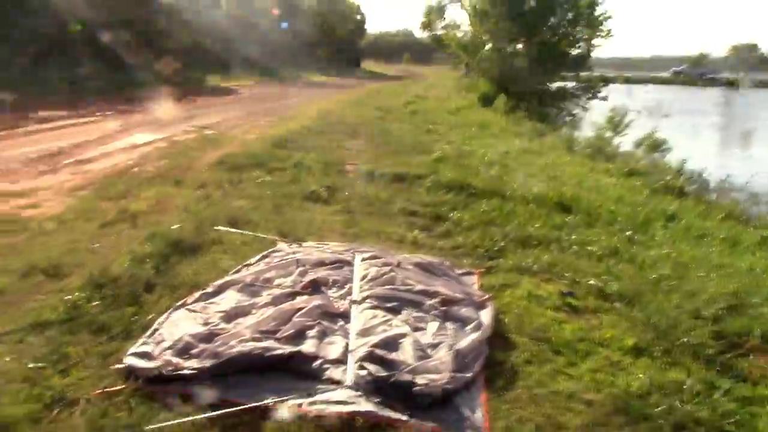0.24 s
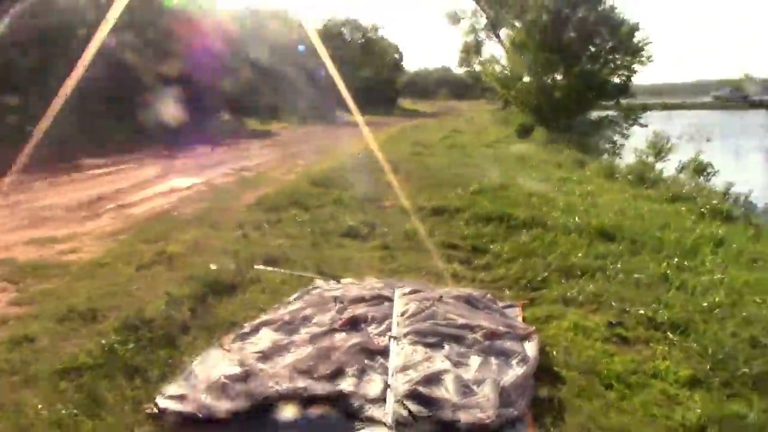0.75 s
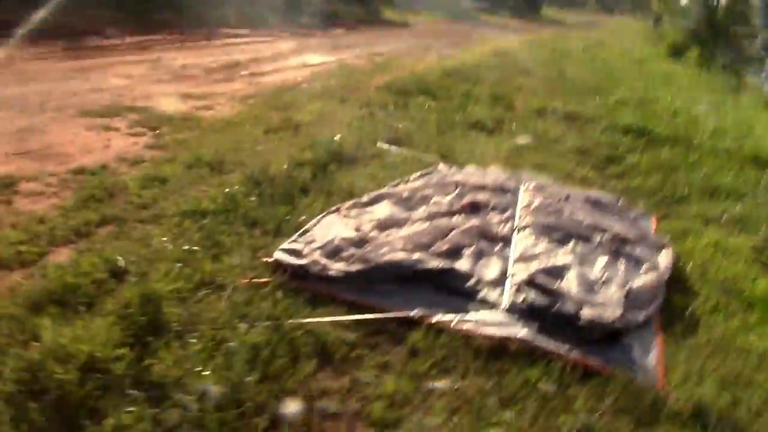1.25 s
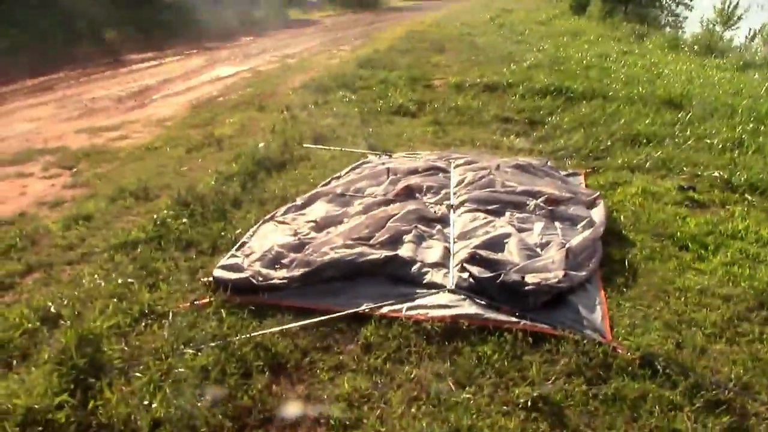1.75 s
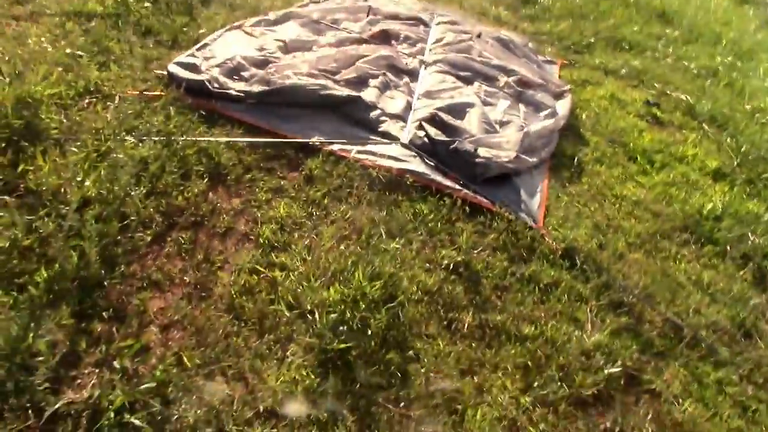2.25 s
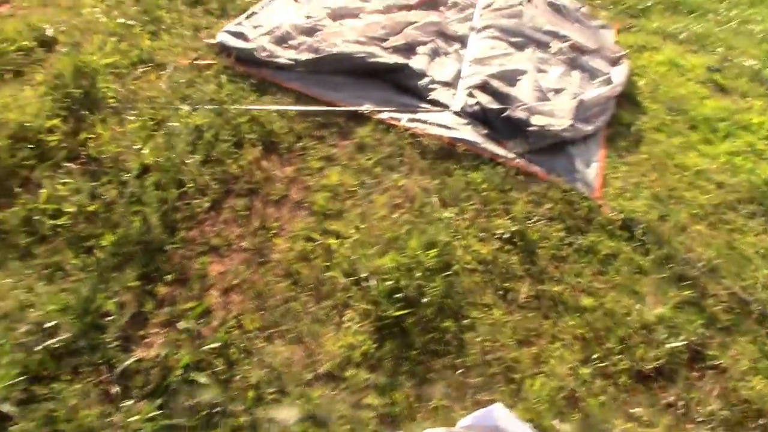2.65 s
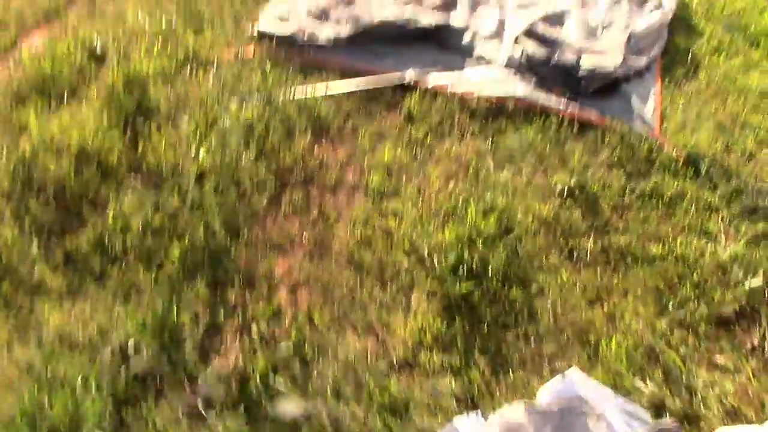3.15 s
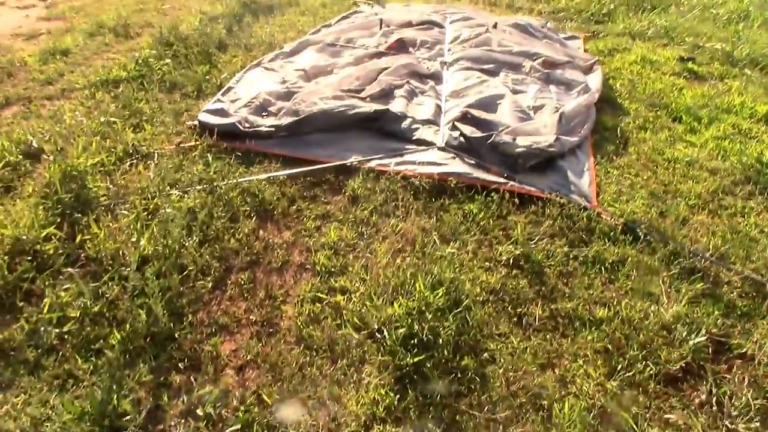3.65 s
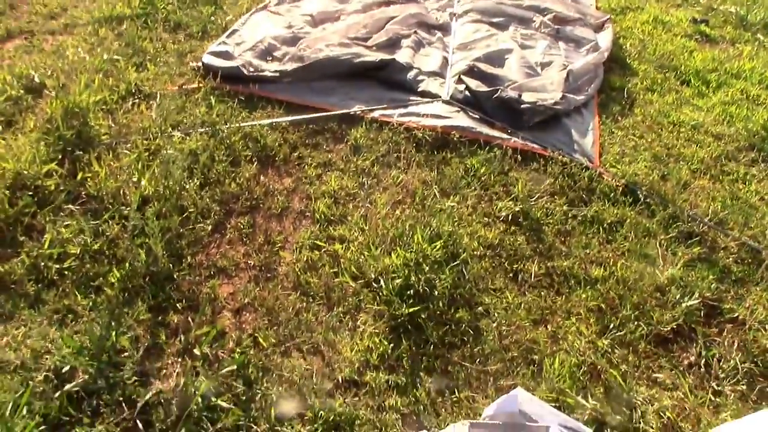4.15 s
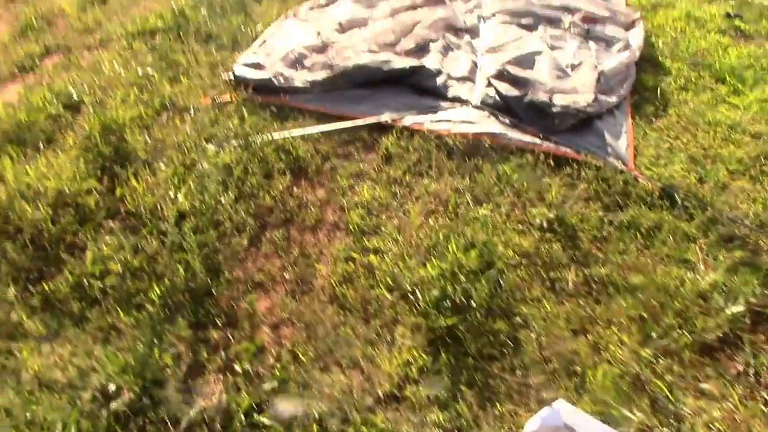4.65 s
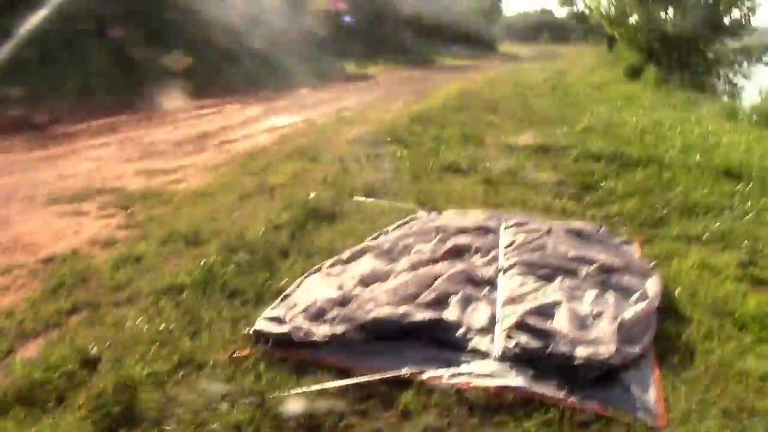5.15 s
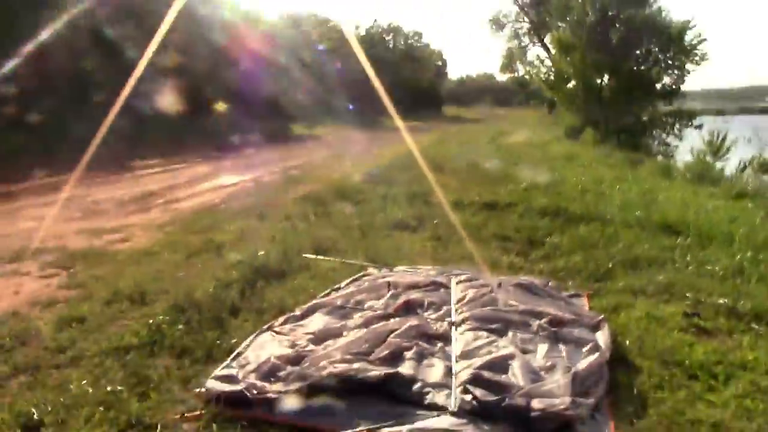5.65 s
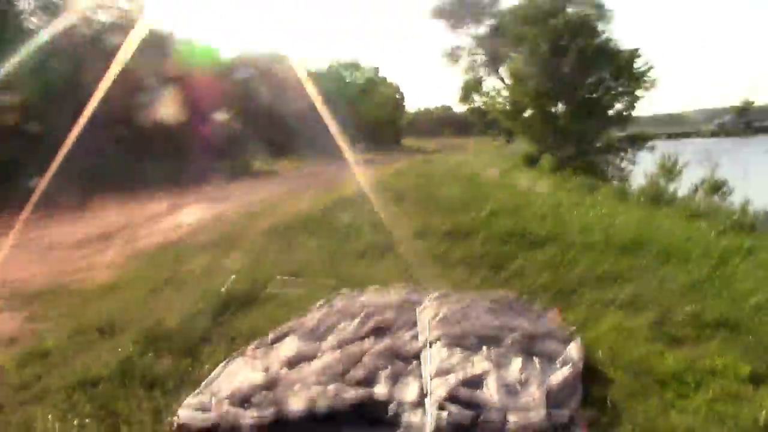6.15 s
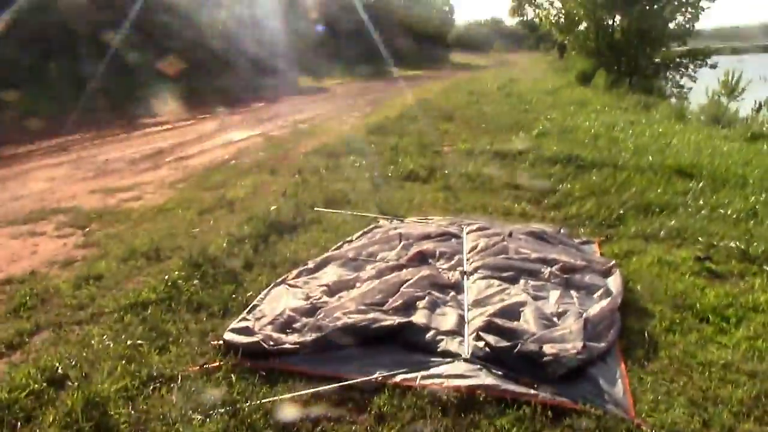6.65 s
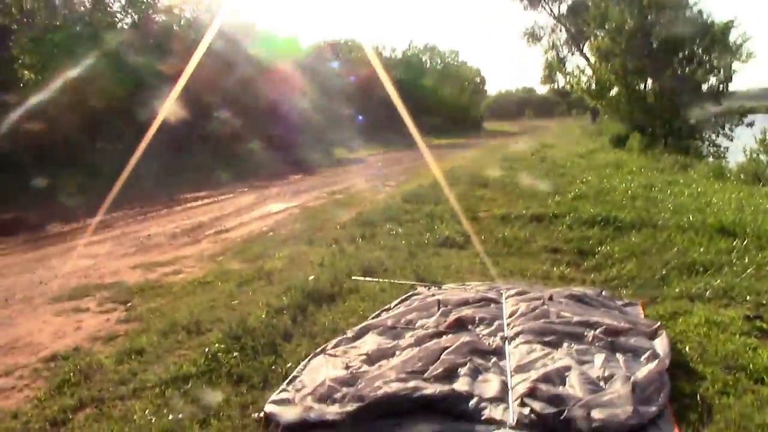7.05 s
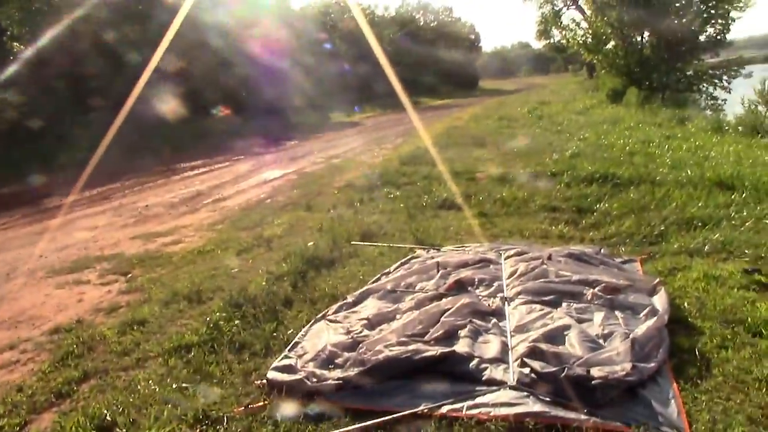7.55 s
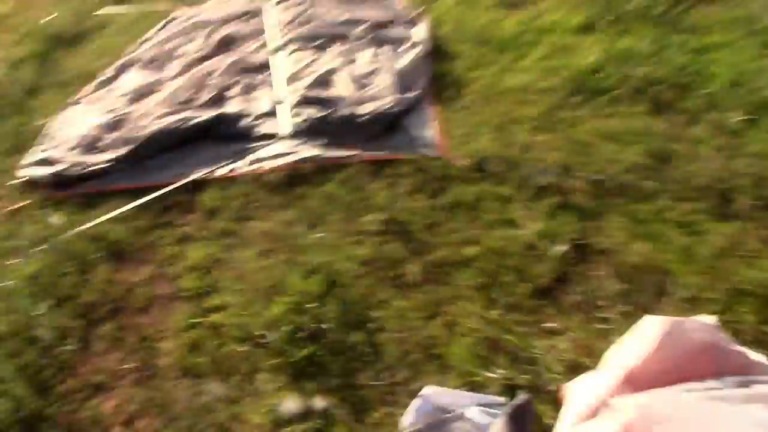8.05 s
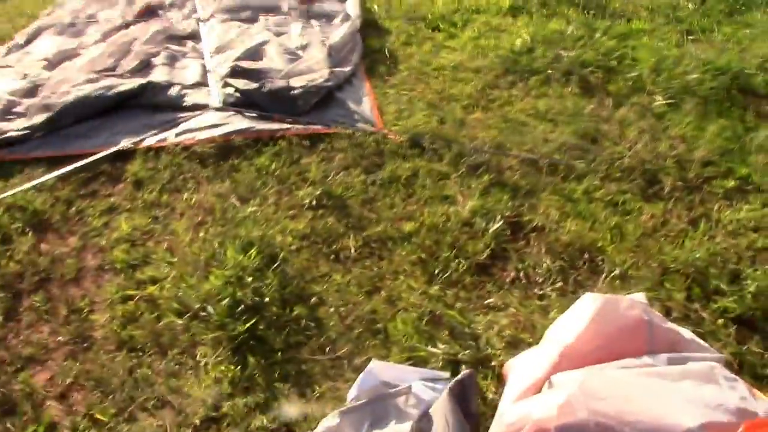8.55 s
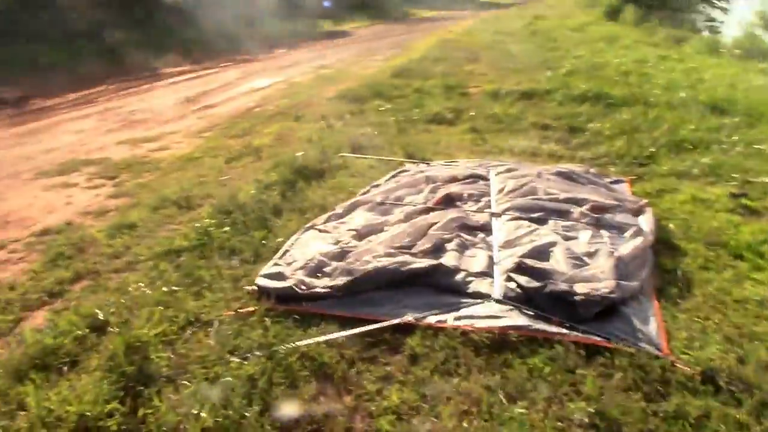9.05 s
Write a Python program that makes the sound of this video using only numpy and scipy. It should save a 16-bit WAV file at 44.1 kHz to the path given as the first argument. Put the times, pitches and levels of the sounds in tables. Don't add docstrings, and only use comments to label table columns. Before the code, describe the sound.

Thin tent poles clack, knock and tick close up as nylon rustles, with faint insects whining over a quiet outdoor hush.

```python
import sys
import numpy as np
from scipy import signal
from scipy.fft import rfft, irfft, next_fast_len
from scipy.io import wavfile
from scipy.ndimage import uniform_filter1d

SR = 44100
rng = np.random.default_rng(int(sys.argv[2]) if len(sys.argv) > 2 else 0)


def volts_from_decibels(level):
    exponent = np.asarray(level, float) / 20
    return 10 ** exponent


def master(y):
    cut = np.clip(np.atleast_2d(y).T, -1, 1)
    pcm = np.round(cut * 32767)
    wavfile.write(sys.argv[1], SR, pcm.astype(np.int16))


N = 410571


def rms_one(x):
    return x / np.sqrt(np.mean(x ** 2) + 1e-20)


def filtered(x, order, hz, kind):
    return signal.sosfilt(signal.butter(order, hz, kind, fs=SR, output="sos"), x)


def in_time(rows):
    s, *columns = np.transpose(rows)
    return [np.interp(np.arange(N) / SR, s, c) for c in columns]


def drift(rate_hz):
    r = np.exp(-80 * np.pi * rate_hz / SR)
    slow = signal.lfilter([1], [1, -2 * r, r * r], rng.standard_normal(N // 40 + 2002))[2000:]
    return np.interp(np.arange(N) / 40, np.arange(len(slow)), rms_one(slow))


def resonate(x, hz, width_hz):
    r = np.exp(-np.pi * width_hz / SR)
    denominator = [1, -2 * r * np.cos(2 * np.pi * hz / SR), r * r]
    return signal.lfilter([(1 - r * r) / 2, 0, (r * r - 1) / 2], denominator, x)


def coloured(x, spectrum):
    hz, db = np.transpose(spectrum)
    size = next_fast_len(N)
    log_hz = np.log(np.arange(size // 2 + 1) * SR / size + 1)
    gain = volts_from_decibels(np.interp(log_hz, np.log(hz), db))
    return rms_one(irfft(rfft(x, size) * gain, size)[:N])


def whine(hz, width_hz, size=N):
    once = resonate(rng.standard_normal(size), hz, width_hz)
    return rms_one(resonate(once, hz, 2 * width_hz))


def brief_whines(rows):
    out = np.zeros(N)
    for s, half_s, hz, width_hz, db in rows:
        at = max(round(s * SR) - SR, 0)
        t = np.arange(at, at + 2 * SR) / SR
        add = volts_from_decibels(db) * np.exp(-((t - s) / half_s) ** 4) * whine(hz, width_hz, size=2 * SR)
        out[at:at + 2 * SR] += add[:N - at]
    return out


def grit(per_s, spread_db):
    sizes = volts_from_decibels(spread_db * np.minimum(rng.exponential(1, N), 3.5)) * rng.choice([-1, 1], N)
    return rms_one(sizes * (rng.random(N) < per_s / SR) + 1e-9)


def rubbed(body, per_s, spread_db, patchy_db):
    out = 0
    for hz, width_hz, db in body:
        once = resonate(grit(per_s, spread_db), hz, width_hz)
        ring = rms_one(resonate(once, hz, 5.45 * width_hz))
        out = out + volts_from_decibels(db + patchy_db * drift(46.0)) * ring
    return rms_one(out)


def blows(rows, t60_s, width_share, contact_s, spill_db, spill_hz):
    out, t = np.zeros(N + 2048), np.arange(2048) / SR
    chatter, chance = rng.standard_normal((len(rows), 2048)), rng.uniform(-1, 1, (len(rows), 2))
    for (s, db, hz), noise, (off, grip) in zip(rows, chatter, chance):
        t60 = t60_s * volts_from_decibels(0.58 * grip)
        noise[4] = 2.9
        decay = np.exp(-t / contact_s) + 0.77 * volts_from_decibels(-45 * t / t60)
        force = noise * (1 - np.exp(-t / 0.0001)) * decay
        ring = resonate(force, hz, 2.94 / t60)
        ring = ring + 0.61 * resonate(force, hz * (1 + width_share * off), 6.2 / t60)
        blow = ring / np.abs(ring).max() + volts_from_decibels(spill_db) * force / np.abs(force).max()
        blow = filtered(blow, 3, spill_hz, "band")
        at = round(s * SR)
        out[at:at + 2048] += volts_from_decibels(db) * blow / np.abs(blow).max()
    return out[:N]


# f/Hz, level/dB
HUSH = [(25, -28), (200, 0), (384, 1), (863, 2.5), (3160, -7.5), (4370, 5), (5730, -43), (16000, -38)]


def outdoor_hush():
    return volts_from_decibels(-46 - 6) * coloured(rng.standard_normal(N), HUSH)


# t/s, song level/dB, overtone level/dB
CHORUS = [
    (0.0, -42.5, -55),
    (1.74, -40, -52),
    (3.6, -43, -56),
    (4.3, -44, -59),
    (5.94, -45, -63),
    (8.51, -55, -66),
    (9.31, -47, -56),
]
# f/Hz, width/Hz, level/dB
SONG = [(3630, 320, -8.5), (4160, 850, -4.5), (4393, 160, -6.5), (4635, 280, -7.5)]
# low f/Hz, high f/Hz, level/dB
OVERTONES = [(7350, 9240, 3), (11000, 12530, 1.5)]
# centre t/s, half length/s, f/Hz, width/Hz, level/dB
SOLOS = [(0.67, 0.32, 1900, 130, -54.5), (1.17, 0.31, 3820, 32, -50), (0.34, 0.5, 4500, 33, -52),
         (0.72, 0.22, 4330, 35, -53), (1.35, .2, 4470, 36, -54), (0.82, 0.35, 3735, 30, -53),
         (1.45, 0.15, 4150, 40, -59), (1.7, 0.23, 3300, 42, -54), (3.2, 0.7, 7740, 550, -56.5),
         (4.4, 0.48, 2730, 320, -49.5)]


def insects():
    song_db, overtone_db = in_time(CHORUS)
    song = sum(volts_from_decibels(db + 1.5 * drift(4)) * whine(hz, width_hz) for hz, width_hz, db in SONG)
    over = 0
    for low, high, db in OVERTONES:
        band = rms_one(filtered(rng.standard_normal(N), 2, (low, high), "band"))
        over = over + volts_from_decibels(db + 1.6 * drift(13.0)) * band
    chorus = volts_from_decibels(song_db - 5.5) * rms_one(song) + volts_from_decibels(overtone_db + 1.0) * rms_one(over)
    return chorus + brief_whines(SOLOS)


# t/s, length/s, pole level/dB, nylon level/dB
MOVES = [(0.091, 0.16, -48, -55), (0.681, 0.26, -47.5, -52), (1.174, 0.049, -45.5, -53),
         (1.758, 0.23, -46, -50), (1.89, 0.037, -35.5, -39.5), (1.977, 0.13, -44, -66),
         (2.256, 0.044, -35, -44), (2.4, 0.33, -48, -62), (2.697, 0.2, -43.5, -49.5),
         (2.993, 0.068, -44.5, -60), (3.132, 0.16, -36.5, -46.5), (3.365, 0.21, -43, -45.5),
         (3.486, 0.18, -41, -49), (3.813, 0.21, -47.5, -53.5), (3.924, 0.18, -42.5, -52),
         (4.21, 0.15, -41, -50), (4.631, 0.22, -46, -52.5), (5.195, 0.2, -46.5, -60),
         (5.49, 0.36, -50.5, -69), (5.785, 0.14, -47.5, -59), (6.828, 0.033, -36, -53),
         (6.866, .1, -46, -60), (7.058, 0.14, -51, -55.5), (7.739, 0.096, -37.5, -47),
         (7.77, 0.26, -40, -41.5), (8.358, 0.51, -46.5, -58), (8.528, 0.07, -41.5, -44.5),
         (8.56, .04, -35, -50), (8.718, 0.071, -44, -50.5), (8.857, 0.056, -41, -43.5),
         (8.962, 0.27, -48, -56), (9.12, 0.16, -41.5, -63)]
# t/s, length/s, rumble level/dB, scrape level/dB
JOLTS = [(1.615, 0.14, -51, -51), (1.678, 0.019, -26, -26), (2.098, 0.41, -53, -47.5),
         (2.133, 0.02, -29, -28.5), (2.477, 0.027, -30.5, -23), (3.242, 0.027, -25.5, -42),
         (3.493, 0.032, -35, -34), (4.322, 0.028, -35, -30), (4.44, 0.17, -47, -63),
         (4.914, 0.015, -19, -15), (4.924, 0.024, -19, -16), (4.952, 0.015, -21, -18),
         (4.963, 0.026, -17.5, -37), (4.988, 0.035, -28, -23), (5.011, 0.022, -22.5, -28),
         (5.049, 0.046, -36, -32.5), (5.441, 0.076, -46, -40.5), (5.506, 0.037, -34.5, -37),
         (5.625, 0.019, -24, -39), (5.64, 0.027, -20.5, -25.5), (5.855, 0.051, -40, -37),
         (6.088, 0.077, -42, -35), (6.143, 0.042, -20, -25), (6.339, 0.053, -35.5, -39.5),
         (6.545, 0.0097, -25.5, -25), (6.608, 0.5, -46.5, -54), (6.821, 0.026, -37, -26),
         (7.701, 0.014, -40, -26), (7.846, 0.058, -30, -32), (7.878, 0.038, -29.5, -26.5),
         (7.916, 0.087, -32, -33), (7.963, 0.044, -33, -34), (7.996, 0.032, -21, -16.5),
         (8.035, 0.032, -24.5, -26.5), (8.117, 0.054, -37, -44), (8.633, 0.059, -31.5, -31),
         (8.961, 0.017, -23, -22)]
# t/s, length/s, nylon level/dB
SWISHES = [(4.473, 0.028, -38.5), (6.275, 0.072, -48), (6.09, 0.067, -46), (6.894, 0.038, -47.5),
           (6.93, 0.028, -31), (7.893, 0.018, -32), (8.645, 0.021, -37), (7.447, 0.082, -51.5),
           (8.242, 0.02, -45), (8.377, .03, -40.5), (8.399, 0.024, -35)]


def movements():
    moves = [(s, length, db - 0.4, db, cloth) for s, length, db, cloth in MOVES]
    jolts = [(s, length, low, high, high - 24) for s, length, low, high in JOLTS]
    swishes = [(s, length, db - 10.5, db - 1, db) for s, length, db in SWISHES]
    return moves + jolts + swishes


RESTING_DB = np.array([-56, -55, -63])
# f/Hz, width/Hz, level/dB
RUMBLE = [(345, 99, -4.5), (560, 370, -3), (833, 310, -4.5), (1310, 120, -23)]
# f/Hz, width/Hz, level/dB
TUBE = [(1860, 820, 7.5), (2250, 66, 1), (2827, 210, 2.5), (3040, 150, -13)]
# f/Hz, level/dB
NYLON = [(1470, -23), (2500, -5.5), (3550, -7), (5560, -4), (7130, -10), (10600, -14.5), (14000, -22),
         (15800, -23)]


def handling():
    t, power = np.arange(N) / SR, np.zeros((3, N)) + volts_from_decibels(RESTING_DB)[:, None] ** 2
    for s, length_s, *db in movements():
        span = slice(round(s * SR), round((s + 2 * length_s) * SR))
        since = np.abs(t[span] - s)
        shape = np.minimum(since / 0.0082, 1) ** 2 * np.exp(-2 * (since / length_s) ** 3)
        power[:, span] += volts_from_decibels(np.array(db))[:, None] ** 2 * shape
    effort, jostle = np.sqrt(power), np.tanh(drift(68))
    swell = uniform_filter1d(effort[2], size=600)
    rumble = effort[0] * volts_from_decibels(-1.36 + 4.1 * jostle) * rubbed(RUMBLE, 1500, 2.55, patchy_db=4.0)
    rumble = filtered(rumble, 2, 260, "high")
    scrape = effort[1] * volts_from_decibels(-1.14 + 4.9 * jostle) * rubbed(TUBE, 3500, 3.6, patchy_db=3.5)
    nylon = swell * volts_from_decibels(3.0 + 0.7 * jostle + 2.0 * drift(50)) * coloured(grit(14000, 4.2), NYLON)
    sway = rms_one(filtered(rng.standard_normal(N), 2, 130, "low"))
    return rumble + scrape + nylon + effort[0] * volts_from_decibels(-28.5) * sway


# centre t/s, half length/s, f/Hz, level/dB
SQUEAKS = [(1.385, 0.0086, 2240, -38), (1.988, .006, 1790, -36), (4.025, 0.019, 910, -36.5),
           (4.497, 0.0064, 8800, -45), (4.998, 0.009, 1010, -24), (5.82, 0.0061, 5950, -41),
           (5.863, 0.018, 2330, -33.5), (5.873, 0.0072, 5750, -32.5), (6.134, 0.02, 2200, -34),
           (7.852, 0.019, 2180, -29), (7.904, 0.0056, 7050, -23.5), (7.9, 0.0048, 4820, -28.5),
           (8.651, .01, 5660, -35)]


def joint_squeaks():
    return brief_whines([(s, half_s, hz, 0.05 * hz, db) for s, half_s, hz, db in SQUEAKS])


# t/s, level/dB, f/Hz
FLICKS = [
    (1.0077, -33, 2150),
    (1.0396, -35, 2390),
    (1.378, -18.5, 5500),
    (1.4711, -33, 2270),
    (3.2665, -18, 4700),
    (6.868, -28, 1100),
    (6.896, -27, 800),
    (6.911, -22, 800),
    (5.379, -29, 1790),
]
# centre t/s, half length/s, f/Hz, level/dB
RASPS = [
    (6.937, .004, 10200, -26.5),
    (6.943, .007, 5800, -27.5),
    (6.946, .004, 9700, -30),
    (6.956, 0.0054, 2280, -34),
]


def loose_ends():
    flicks = blows(FLICKS, 0.015, 0.11, 0.00083, spill_db=-4.0, spill_hz=[500, 6000])
    return flicks + brief_whines([(s, half_s, hz, 0.15 * hz, db) for s, half_s, hz, db in RASPS])


def side_ring(s, db, hz):
    return list(zip(s, db, hz * (1 + 0.13 * rng.uniform(-1.16, 1, len(s)))))


# t/s, wall peak level/dB, ring f/Hz, ferrule tick level/dB
CLACKS = [(0.7533, -4, 2740, -25), (1.681, -7.5, 2440, -17.5), (2.1235, -3, 2750, -10),
          (2.4937, -8, 2840, -38), (3.208, -10, 2710, -26), (3.2284, -16, 2600, -34),
          (3.248, -2, 2750, -16), (3.503, -12.5, 1860, -30), (3.5155, -7, 2250, -9.5),
          (4.9184, -1.5, 2430, -36), (4.9282, -8, 2300, -28), (4.9623, -8, 2420, -7),
          (4.9708, 4.5, 2320, -11), (4.995, -17, 2070, -14), (5.0213, -4, 2900, -6), (5.023, -8, 2900, -32),
          (5.0424, -2.5, 2500, -16), (5.817, -13.5, 2240, -44), (6.1623, -4, 1940, -4.5),
          (6.174, -6, 2040, -28), (6.7328, -11, 2170, -14.5), (6.829, -11.5, 2020, -16.5),
          (7.4793, -10.5, 2400, -45), (7.7068, -7, 2880, -10.5), (7.874, -9, 1650, -29),
          (7.998, 1, 2480, -34), (8.0038, 0, 2600, -7), (8.0335, -9, 2750, -32), (8.5876, -3, 2790, -14.5),
          (8.9705, -8.5, 1840, -49)]
# t/s, wall peak level/dB, ring f/Hz, ferrule tick level/dB
TAPS = [(0.2711, -16.5, 1930, -19), (1.378, -19, 2240, -21), (1.635, -22, 2450, -26),
        (1.769, -13.5, 3410, -25), (2.1514, -12.5, 2250, -14), (2.243, -16, 1610, -24),
        (2.3146, -13.5, 2450, -17), (2.4883, -11.5, 3000, -31), (2.9776, -18.5, 1970, -18.5),
        (3.381, -19.5, 1930, -16), (3.3992, -11.5, 2600, -23), (3.946, -12, 2080, -6),
        (4.102, -24, 3280, -15), (4.3444, -13.5, 2520, -19), (4.835, -17.5, 2250, -26.5),
        (5.27, -16.5, 4760, -28), (5.521, -15.5, 2680, -16), (5.647, -13.5, 2780, -3.5),
        (5.7795, -21, 2330, -22), (6.051, -22, 3250, -23), (6.1556, -7, 2070, -10.5),
        (6.2066, -19.5, 2250, -16), (6.3492, -16.5, 2730, -15.5), (6.626, -29, 2250, -26.5),
        (8.2423, -22.5, 4350, -34), (8.468, -24.5, 2250, -27), (8.479, -16.5, 2060, -22),
        (8.659, -15, 3020, -28), (8.6766, -8, 1570, -8.5), (9.1925, -17, 1880, -34)]
# t/s, wall peak level/dB, ring f/Hz, section knock level/dB
BUMPS = [(.698, -22.5, 2830, -29), (.959, -15.5, 2250, -58), (1.223, -15, 2060, -23.5),
         (1.9241, -16.5, 3970, -26), (1.9876, -23.5, 3130, -52), (2.0364, -17, 2140, -28),
         (2.146, -18, 2330, -25), (2.216, -19, 2700, -36), (2.725, -18.5, 2580, -49),
         (3.153, -19.5, 2140, -33), (3.267, -19, 2690, -40), (3.61, -20.5, 2410, -21.5),
         (3.7462, -23.5, 2320, -19.5), (4.017, -20.5, 2570, -22.5), (4.226, -20, 2850, -43),
         (4.478, -22.5, 2220, -31), (5.0737, -15.5, 2260, -20), (5.2034, -18, 2540, -19.5),
         (5.339, -20, 2540, -21), (5.7067, -18, 2250, -28.5), (5.81, -14, 2320, -20),
         (6.3618, -14, 2070, -46), (6.5503, -31, 2100, -34), (8.077, -13.5, 2900, -42),
         (8.257, -45, 2110, -20), (8.712, -20, 2750, -43), (8.828, -22, 2350, -20),
         (8.889, -21, 2170, -22.5), (8.9535, -33, 2250, -19.5), (9.1512, -21, 2700, -24)]
# t/s, wall peak level/dB
TOUCHES = [(0.787, -18), (0.8056, -17), (0.9779, -20.5), (1.101, -25.5), (1.2156, -21.5), (1.49, -26.5),
           (1.9042, -22.5), (2.237, -21), (2.3882, -26.5), (2.5352, -22.5), (2.9974, -20.5), (3.0408, -20),
           (3.0884, -23), (3.1394, -24), (3.328, -21), (3.904, -28), (4.531, -28), (3.573, -25),
           (5.661, -26), (6.3755, -21), (6.48, -26.5), (6.6463, -23.5), (6.9625, -18.5), (8.113, -27.5),
           (8.2, -24.5), (8.7844, -22.5), (.136, -27), (0.987, -31), (1.2455, -31), (1.319, -31),
           (1.336, -31), (2.718, -26), (3.2575, -14), (3.958, -27), (3.9645, -22), (3.97, -23),
           (4.032, -31), (4.9169, -18), (4.94, -19), (5.017, -7), (5.058, -20), (5.513, -24), (5.529, -19),
           (5.577, -31), (5.632, -26), (5.643, -13.5), (6.08, -25), (7.8615, -20), (7.918, -21),
           (7.9233, -16), (7.968, -22), (8.059, -25), (8.7515, -30), (9.236, -32), (9.0202, -22.5),
           (9.1248, -21.5)]
# t/s, peak level/dB, ring f/Hz
KNOCKS = [(.7564, -11, 795), (1.6811, -12.5, 1100), (2.1432, -9.5, 1040), (2.2166, -19.5, 500),
          (2.2793, -22, 1060), (2.487, -7, 900), (2.7277, -21.5, 507), (3.2095, -10.5, 700),
          (3.229, -12, 660), (3.2485, -7.5, 1010), (3.5157, -8, 844), (3.9492, -12.5, 860),
          (4.345, -9, 846), (4.9216, -17, 1250), (4.9628, -6, 755), (4.9712, -7, 970), (4.9958, -25, 1010),
          (5.0094, -13, 786), (5.3352, -22, 354), (5.5212, -8, 607), (5.6462, -11.5, 516),
          (6.3494, -17, 576), (6.828, -17, 960), (7.8734, -13.5, 1350), (7.927, -13, 685),
          (8.0036, -5, 706), (8.0803, -12, 890), (8.5876, -11.5, 1070), (8.6765, -9, 560),
          (8.9726, -15.5, 920),
          (0.2717, -26, 1300), (.8058, -28.5, 714), (1.19, -31, 800), (1.337, -31, 423), (1.7177, -26, 345),
          (2.2062, -23, 1070), (2.23, -33, 800), (2.2366, -23, 820), (2.2726, -19, 1050), (2.5, -17, 805),
          (2.742, -27, 534), (2.997, -27.5, 1100), (3.328, -36, 750), (3.4153, -23.5, 775),
          (3.574, -22, 1270), (3.693, -33, 775), (3.957, -19.5, 900), (4.0363, -34, 930), (4.139, -31, 820),
          (4.2268, -25.5, 990), (4.308, -26, 670), (4.3293, -27, 1200), (4.398, -33, 686),
          (4.477, -28.5, 800), (4.532, -30.5, 930), (4.726, -30.5, 750), (4.926, -10, 1030),
          (4.941, -13, 1090), (5.026, -16, 890), (5.218, -27, 1180), (5.575, -28, 950), (5.891, -29, 900),
          (5.9056, -26.5, 370), (6.178, -16, 980), (6.217, -26, 850), (6.625, -23.5, 696),
          (6.6458, -29, 1050), (7.316, -37, 485), (7.4793, -35, 1270), (7.614, -31.5, 776),
          (7.791, -31, 520), (7.801, -26, 540), (7.908, -20, 1190), (7.9407, -16, 816), (7.947, -16.5, 680),
          (8.033, -13.5, 1450), (8.201, -28, 950), (8.581, -23, 705), (8.845, -29, 870),
          (9.021, -30.5, 430), (9.292, -29.5, 930)]
# t/s, peak level/dB, ring f/Hz
TICKS = [(1.7254, -22.5, 5500), (1.772, -11.5, 4940), (1.8985, -19, 5600), (3.2083, -4, 8430),
         (5.334, -16.5, 6000), (2.137, -23, 6160), (3.157, -27, 5300), (3.2567, -26, 5100),
         (4.333, -32, 9300), (4.4927, -24.5, 6960), (5.2955, -30, 4970), (5.6395, -22, 4600),
         (7.7064, -10, 10600), (5.7985, -35, 8600), (2.2418, -22, 13000), (6.385, -43, 11000),
         (6.408, -39, 11500), (6.48, -35, 8050), (6.633, -44, 10900), (6.844, -29, 5500),
         (7.9675, -30, 5600), (8.4497, -36, 6000), (8.711, -29, 6950), (9.0164, -38, 9200),
         (4.2258, -24, 7900), (.8031, -27, 7540), (2.5351, -27.5, 7830), (5.9061, -24.5, 5970),
         (6.9323, -18, 9000), (7.8486, -15.5, 5800), (7.8742, 1, 8560), (7.9974, -1, 7750),
         (8.059, -23, 5100), (9.1849, -23.5, 5100)]


def poles():
    wall_hz, section_hz, ferrule_hz = 2250, 920, 5930
    tick_lead_s, knock_lag_s = 0.0006, 0.00048
    edged, taps, bumps = np.array(CLACKS + TAPS), np.array(TAPS), np.array(BUMPS)
    light = np.array([row[:2] for row in BUMPS + TOUCHES])

    wall = [row[:3] for row in CLACKS + TAPS + BUMPS] + side_ring(*np.transpose(TOUCHES), wall_hz)
    section = KNOCKS
    section = section + side_ring(bumps[:, 0] + knock_lag_s, bumps[:, 3], section_hz)
    section = section + side_ring(taps[:, 0] + knock_lag_s, taps[:, 1] - 14, section_hz)
    ferrule = TICKS + side_ring(edged[:, 0] - tick_lead_s, edged[:, 3], ferrule_hz)
    ferrule = ferrule + side_ring(light[:, 0] - tick_lead_s, light[:, 1] - 18, ferrule_hz)

    clacks = blows(wall, 0.018, 0.12, 0.0012, spill_db=1.0, spill_hz=[1100, 5000])
    knocks = blows(section, 0.024, 0.094, 0.00092, spill_db=12.5, spill_hz=[240, 1600])
    ticks = blows(ferrule, 0.0077, 0.24, 0.00029, spill_db=-3.0, spill_hz=[4200, 13200.0])
    return clacks + knocks + ticks


def with_ground(near):
    lag = round(0.0049 * SR)
    echo = signal.lfilter([.4], [1, -.6], np.pad(near, (lag, 0))[:N])
    return filtered(near + volts_from_decibels(-22.5) * echo, 2, 230, "high")


def scene():
    background = outdoor_hush() + insects()
    hands = handling() + joint_squeaks() + loose_ends()
    return (background + hands + with_ground(poles()))[None]


# t/s, length/s, gone above f/Hz
DROPOUTS = [
    (4.902, .009, 900),
    (4.981, .011, 6500),
    (5.032, .008, 5500),
    (7.687, .015, 1900),
    (7.713, .018, 8000),
    (7.882, .011, 8500),
    (7.988, .006, 2500),
]


def with_treble_gaps(x):
    out = x.copy()
    for s, length_s, hz in DROPOUTS:
        span = slice(round(s * SR) - 512, round((s + length_s) * SR) + 512)
        gate = np.pad(signal.windows.tukey(round(length_s * SR), .3), 512)
        piece = x[:, span]
        high = signal.butter(6, hz, "high", fs=SR, output="sos")
        treble = signal.sosfiltfilt(high, piece)
        out[:, span] -= (1 - volts_from_decibels(-23)) * np.resize(gate, piece.shape[1]) * treble
    return out


def low_pass(x):
    return signal.sosfilt(signal.butter(12, 16520, fs=SR, output="sos"), x)


def record(dry):
    edge = signal.cheby2(14, 50, 16100, fs=SR, output="sos")
    brim = signal.cheby2(8, 40, 15300, "high", fs=SR, output="sos")
    cut = signal.cheby2(14, 90, 16900, fs=SR, output="sos")
    quiet = signal.sosfilt(edge, dry + volts_from_decibels(-72) * rng.standard_normal(dry.shape))
    hardness = np.tanh(30.0 * uniform_filter1d(np.abs(dry), size=200)) ** 2
    loud = np.clip(quiet + volts_from_decibels(-6.0) * signal.sosfilt(brim, dry) * hardness, -.95, .95)
    loud = filtered(loud, 1, 60, "high")
    mix = with_treble_gaps(signal.sosfilt(cut, loud))
    return low_pass(mix)


dry = scene()
out = record(dry)
master(out)
```